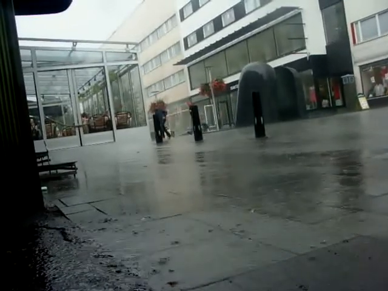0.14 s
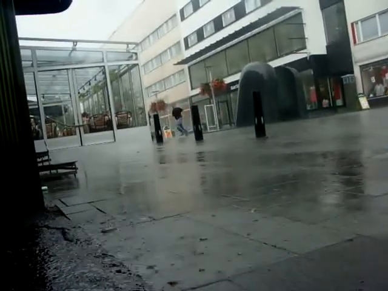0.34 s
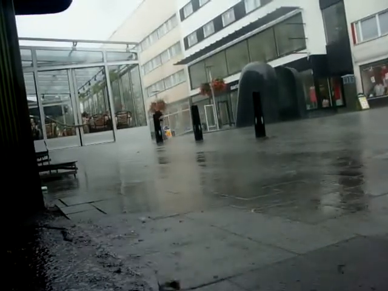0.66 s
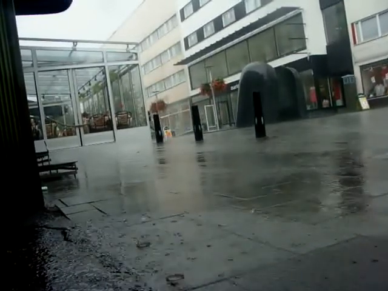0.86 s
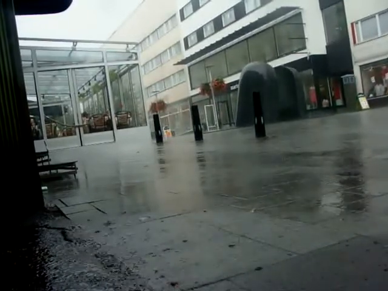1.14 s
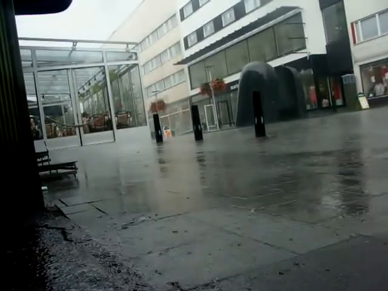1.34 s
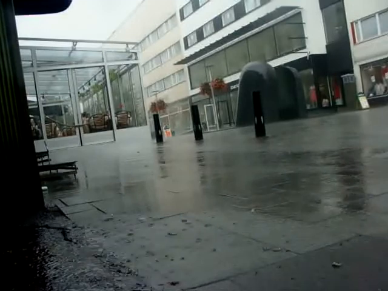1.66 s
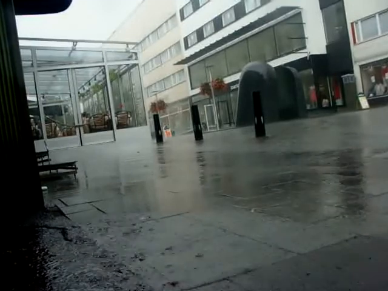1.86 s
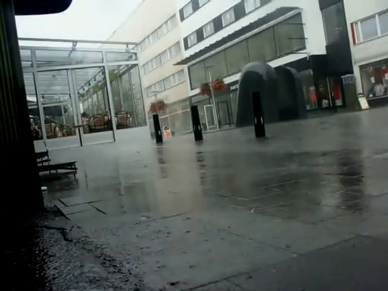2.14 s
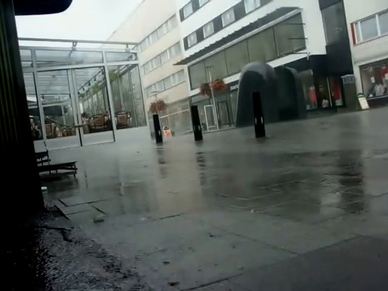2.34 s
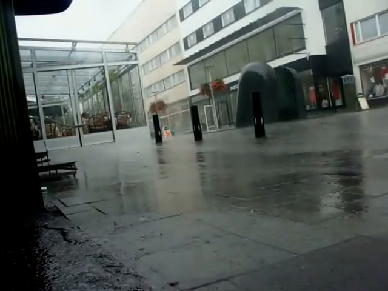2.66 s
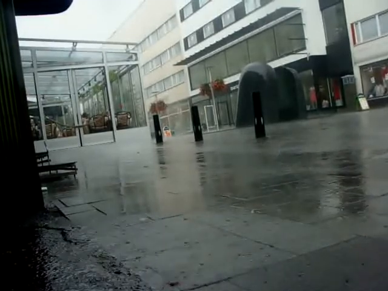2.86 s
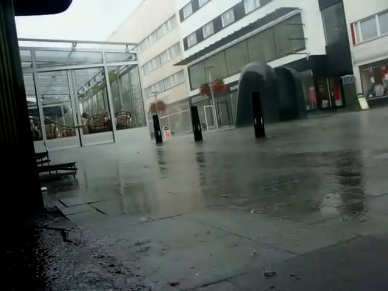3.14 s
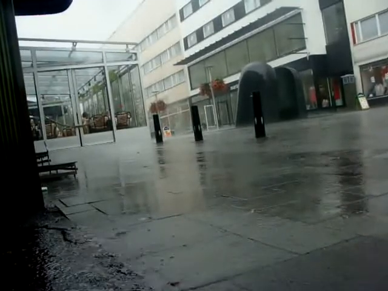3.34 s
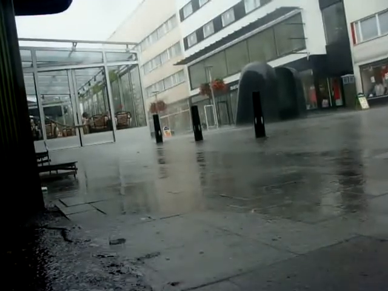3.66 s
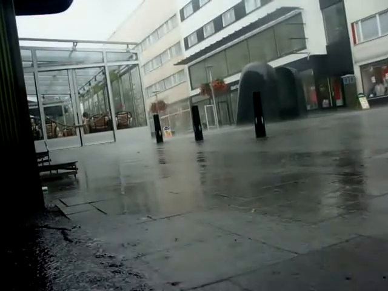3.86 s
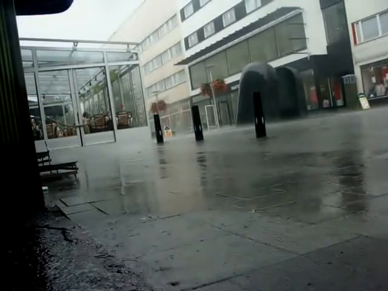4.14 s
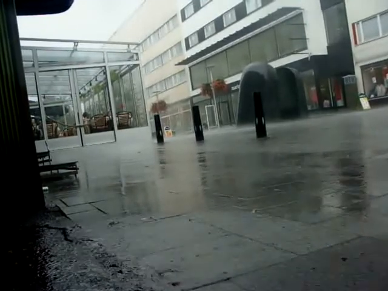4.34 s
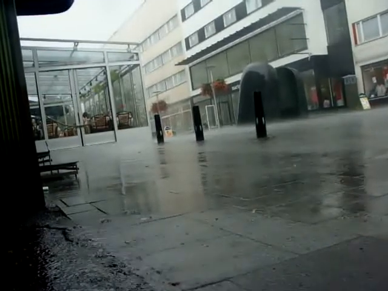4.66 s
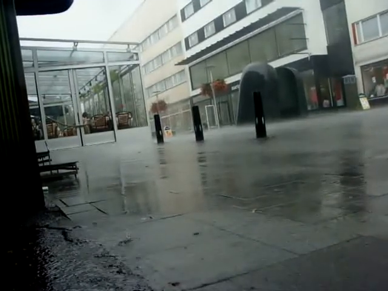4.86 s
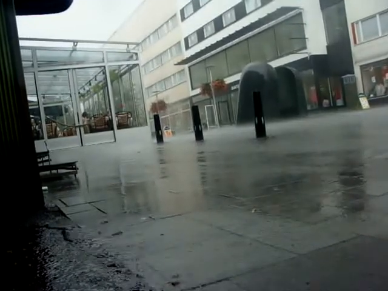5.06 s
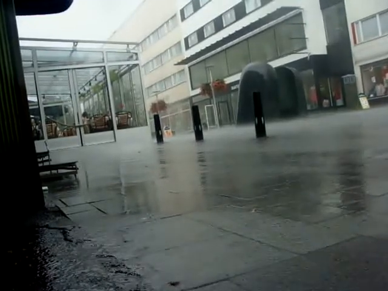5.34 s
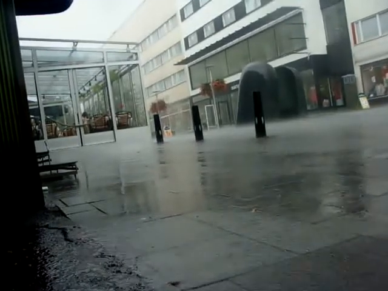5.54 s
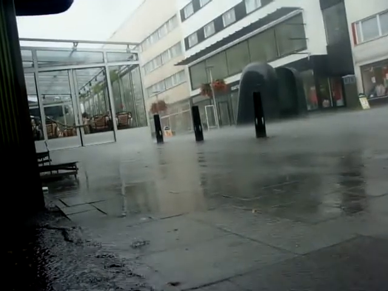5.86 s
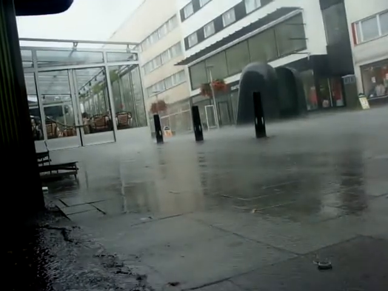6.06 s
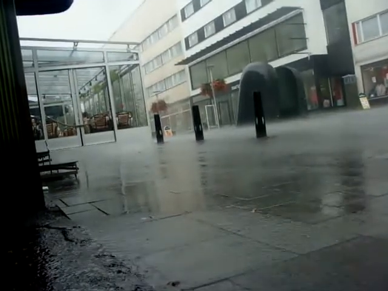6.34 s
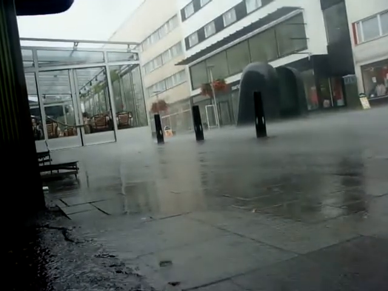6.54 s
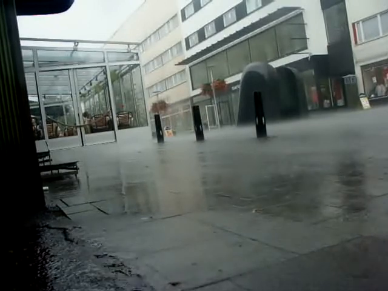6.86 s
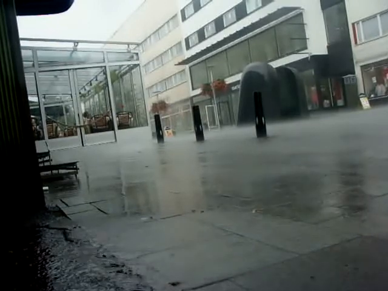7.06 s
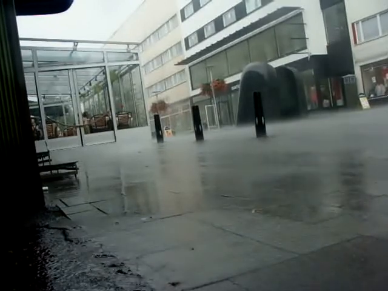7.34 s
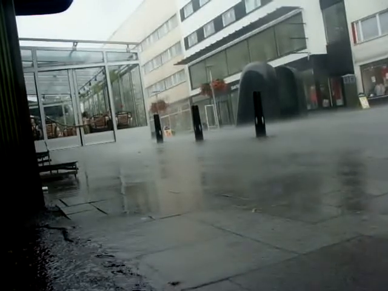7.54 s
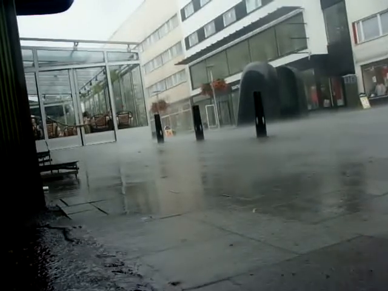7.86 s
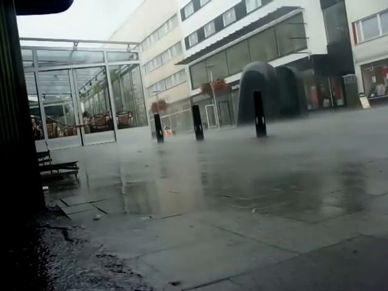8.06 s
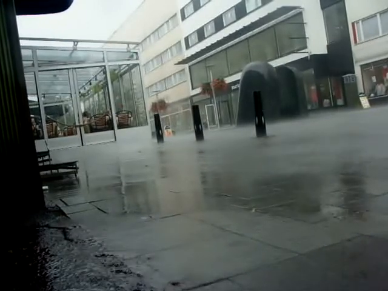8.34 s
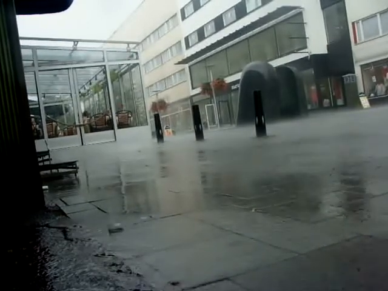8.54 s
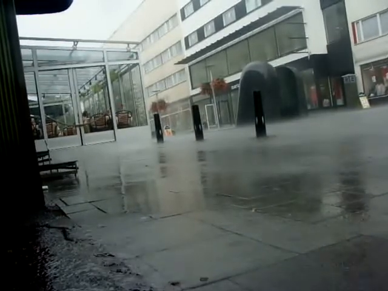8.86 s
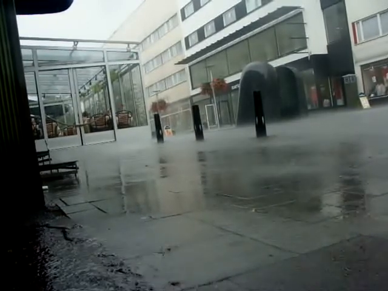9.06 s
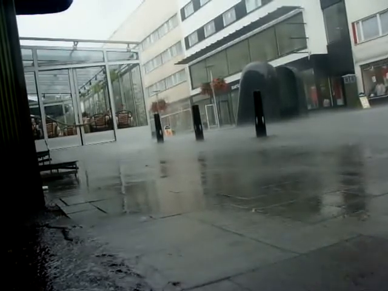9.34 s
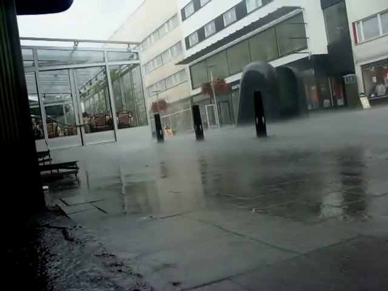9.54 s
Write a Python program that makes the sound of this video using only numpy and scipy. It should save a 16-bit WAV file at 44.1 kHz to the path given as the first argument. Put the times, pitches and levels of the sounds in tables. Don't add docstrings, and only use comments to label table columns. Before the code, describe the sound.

Torrential rain is already at full force at 0 s, a dense continuous hiss over low rumble on flooded street paving, heard from a doorway. Nearer drops patter and tick in the water film. Light eave drips plop with small rising bubble tones around 0.6, 1.1 and 1.3 s; the low roar briefly swells near 1.3 and 2.2 s. The rain eases slightly at 2.5 s, then a heavy drip smacks close with a soft thump at 2.7 s and a duller one at 3.1 s. A lower plop falls at 4.0 s, a patter flurry at 4.5 s, another smack at 4.9 s. From 6 s the downpour thickens, with a sharp plop at 6.2 s and bright ticks. A last heavy smack lands at 8.0 s, and the rain is strongest when it stops at about 9.7 s. Mono small-camera sound, gritty treble, no sharp top.

```python
import sys
import numpy as np
from scipy import signal
from scipy.fft import rfft, irfft, next_fast_len
from scipy.io import wavfile

SR = 44100
rng = np.random.default_rng(int(sys.argv[2]) if len(sys.argv) > 2 else 0)


def volts(x):
    e = np.asarray(x, float) / 20
    return 10 ** e


def transcribe(u):
    v = np.clip(np.atleast_2d(u).T, -1, 1)
    q = np.round(v * 32767).astype(np.int16)
    wavfile.write(sys.argv[1], SR, q)


N = 427329


def rms_one(x):
    return x / np.sqrt(np.mean(x ** 2) + 1e-20)


def in_time(rows):
    s, *columns = np.transpose(rows)
    return [np.interp(np.arange(N) / SR, s, c) for c in columns]


def bells(rows):
    t = np.arange(N) / SR
    return sum(extra_db * np.exp(-0.5 * ((t - s) / half_s) ** 2) for s, extra_db, half_s in rows)


def drift(rate_hz):
    r = np.exp(-80 * np.pi * rate_hz / SR)
    noise = rng.standard_normal(N // 40 + 2002)
    slow = signal.lfilter([1], [1, -2 * r, r * r], noise)[2000:]
    return np.interp(np.arange(N) / 40, np.arange(len(slow)), rms_one(slow))


def ring(clicks, hz, t60_s):
    r = volts(-60 / (t60_s * SR))
    w = 2 * np.pi * hz / SR
    return signal.lfilter([0, np.sin(w)], [1, -2 * r * np.cos(w), r * r], clicks + 1e-18)


def far_rain(rumble_db, hiss_db, spray_db, gust_db, patch_db):
    # pitch_hz, density_db_per_hz
    colour_curve = [(25, -36.5), (70, -13), (195, 0), (298, -7), (410, -2), (520, -3), (615, -7.5),
                    (1020, -5.5), (1190, -6), (2700, -4.5), (4200, -7), (5600, -8), (6800, -13.5),
                    (10200, -19.5)]
    rumble_top_hz, spray_from_hz, lowest_hz = 700, 4500, 44
    size = next_fast_len(N)
    hz = np.maximum(np.arange(size // 2 + 1) * SR / size, 1)
    points = np.array(colour_curve)
    colour_db = np.interp(np.log(hz), np.log(points[:, 0]), points[:, 1])
    white = rfft(rng.standard_normal(size)) * volts(colour_db)
    place = np.clip(2 * np.log2(hz / lowest_hz), 0, 16)
    gust = drift(3.0)
    layers = np.zeros((3, N))
    for k in range(17):
        share = np.cos(np.pi / 2 * np.clip(place - k, -1, 1)) ** 2
        centre_hz = lowest_hz * 2 ** (k / 2)
        treble = np.clip(centre_hz / 8000, 0.15, 1)
        flicker = volts(treble * (gust_db * gust + patch_db * drift(8.0)))
        layer = int(centre_hz > rumble_top_hz) + int(centre_hz > spray_from_hz)
        layers[layer] += flicker * irfft(white * share, size)[:N]
    return sum(volts(db) * rms_one(x) for db, x in zip((rumble_db, hiss_db, spray_db), layers))


def near_drops(level_db, per_s, spread_db, smacks_db):
    sizes = volts(spread_db * np.minimum(rng.exponential(1, N), 3.5)) * rng.choice([-1, 1], N)
    born = sizes * (rng.random(N) < per_s * volts(4.0 * drift(5.0)) / SR)
    pitches_hz = np.geomspace(2600, 9600, 20)
    dealt = rng.integers(0, 20, N)
    rings = np.zeros(N)
    for k, hz in enumerate(pitches_hz):
        pitch_db = -3.5 * np.log2(hz / 4200) ** 2
        rings += ring(born * (dealt == k), hz, 12.0 / hz) * volts(pitch_db)
    smacks = ring(ring(born, 5200, 0.0012), 7500, 0.0006)
    return volts(level_db) * (rms_one(rings) + volts(smacks_db) * rms_one(smacks))


def ticks():
    # start_s, peak_db, pitch_hz, width_hz
    tick_events = [(.7148, -10, 8600, 1300), (1.550, -15, 8100, 800), (1.6388, -9, 7500, 4000),
                   (2.1728, -16, 8250, 500), (2.3528, -10, 7100, 2000), (3.1445, -11, 7000, 3000),
                   (3.6598, -11, 7200, 1000), (4.1698, -11, 7500, 3000), (4.4678, -14, 9600, 1200),
                   (5.8848, -18, 9700, 500), (6.1108, -11, 7100, 1000), (6.6028, -17, 8750, 600),
                   (7.0508, -11, 9000, 2000), (7.4160, -12, 8800, 2000), (8.8966, -10, 8800, 3000),
                   (9.0500, -13, 8400, 1500)]
    out = np.zeros(N)
    for s, peak_db, hz, width_hz in tick_events:
        at = round(s * SR)
        t60_s = np.log(1000) / (np.pi * width_hz)
        out[at:at + 800] += volts(peak_db) * ring(np.arange(800) == 0, hz, t60_s)
    return out


def bubble(t, peak_db, hz, t60_s):
    climb_per_s2 = 1650
    fade = (1 - np.exp(-t / 0.00026)) * volts(-60 * t / t60_s)
    cycles = hz * (t + climb_per_s2 * t60_s * t ** 2 / 2)
    return volts(peak_db) * fade * np.sin(2 * np.pi * cycles), fade


def drips(spatter_db, thump_s):
    # start_s, smack_db, pitch_hz, bubble_t60_s
    splat_events = [
        (2.6723, -4.5, 5350, .018),
        (3.0585, -5, 4600, .012),
        (4.9153, -4, 5400, .007),
        (7.9795, -4.5, 4600, .021),
    ]
    # start_s, peak_db, pitch_hz, t60_s
    plop_events = [(.552, -8, 2600, .011), (.6518, -5, 2780, .024), (.950, -14.5, 4250, .016),
                   (1.09, -10, 3020, .014), (1.330, -14.5, 4380, .016), (3.1646, -14, 3750, .010),
                   (3.3995, -14, 4330, .010), (4.0334, -8, 1730, .012), (4.3745, -12, 4750, .010),
                   (4.4075, -8, 4300, .010), (5.9745, -9, 5460, .008), (6.2078, 0., 4200, .007),
                   (6.2113, -8, 4150, .009), (7.1528, -12, 3450, .013), (8.4375, -9, 5200, .010),
                   (8.65, -11, 5200, .010), (9.2665, -12, 5750, .010)]
    # start_s, peak_db
    thump_events = [
        (2.6721, -27),
        (4.9151, -32),
        (7.9794, -31.5),
    ]
    bubble_under_smack_db, smack_rise_s = 8.0, 0.00023
    out = np.zeros(N + SR)
    t = np.arange(SR // 16) / SR
    bright = signal.butter(2, [4000, 7500], "band", fs=SR, output="sos")
    noise = signal.sosfilt(bright, rng.standard_normal((len(splat_events), len(t))))
    swell = t / smack_rise_s * np.exp(1 - t / smack_rise_s)
    for (s, smack_db, hz, t60_s), spatter in zip(splat_events, noise):
        at = round(s * SR)
        tone, fade = bubble(t, smack_db - bubble_under_smack_db, hz, t60_s)
        partials = ((0.7, 1.02), (0.45, 1.27), (0.2, 1.78))
        crack = swell * sum(share * np.sin(2 * np.pi * ratio * hz * t) for share, ratio in partials)
        out[at:at + len(t)] += tone + volts(smack_db) * (crack + volts(spatter_db) * fade * spatter)
    for s, peak_db, hz, t60_s in plop_events:
        at = round(s * SR)
        out[at:at + len(t)] += bubble(t, peak_db, hz, t60_s)[0]
    for s, peak_db in thump_events:
        at = round(s * SR)
        out[at:at + len(t)] += volts(peak_db) * t / thump_s * np.exp(1 - t / thump_s)
    return out[:N]


def scene():
    # time_s, hiss_db
    rain_curve = [(0.0, -20.5), (1.72, -20.5), (2.53, -21), (5.88, -20), (8.96, -18.5), (9.69, -18)]
    # centre_s, extra_db, half_length_s
    swell_events = [
        (1.32, 2, .15),
        (2.2, 1.5, .12),
        (6.9, 1, 0.72),
    ]
    # centre_s, extra_db, half_length_s
    flurry_events = [
        (1.0, 2.5, 0.06),
        (1.39, -0.5, 0.083),
        (4.47, 3, .13),
    ]
    rain_db, = in_time(rain_curve)
    swing_db = rain_db - rain_db.mean()
    rumble_db = -29.5 + 0.5 * swing_db + bells(swell_events)
    hiss_db = -20.5 + swing_db
    spray_db = -26.5 + 0.9 * swing_db
    street = far_rain(rumble_db, hiss_db, spray_db, gust_db=0.4, patch_db=0.6)
    patter_db = spray_db + bells(flurry_events) - 7.0
    patter = near_drops(patter_db, per_s=350.0, spread_db=4.1, smacks_db=-3.0)
    close = drips(spatter_db=-2.0, thump_s=0.004) + volts(2.8) * ticks()
    return np.tile(street + patter + close, (2, 1))


def subband_basis(count):
    n = np.arange(512) - 255.5
    f = np.linspace(0, 1, 400)[:, None]
    response = np.cos(np.pi / 4 * (1 - np.cos(np.pi * f)))
    shape = (response * np.cos(np.pi * f * n / 32)).sum(0)
    k = np.arange(count)[:, None]
    basis = shape * np.cos(np.pi * (2 * k + 1) * n / 64 + np.pi / 4 * (-1) ** k)
    return basis / np.linalg.norm(basis, axis=1, keepdims=True)


def camera_quantiser(x):
    band_levels = [63, 31, 31, 15, 15, 9, 9, 7, 7, 5] + [3] * 10
    lead_in, full_scale = 244 + 39 * 32, 0.7
    low = signal.resample_poly(x, 320, 441)
    frames = len(low) // 1152 + 3
    span = frames * 1152
    padded = np.pad(low, (lead_in, span + 512 - lead_in - len(low)))
    levels = np.array(band_levels)
    basis = subband_basis(len(levels))
    bands = np.lib.stride_tricks.sliding_window_view(padded, 512)[:span:32] @ basis.T
    bands = bands.reshape(frames, 36, -1)
    peak = np.abs(bands).max(1, keepdims=True) + 1e-9
    scale = 2 ** (np.ceil(3 * np.log2(peak)) / 3)
    step = 2.07 * scale / levels
    rounded = np.clip(np.round(bands / step), -(levels // 2), levels // 2) * step
    pieces = rounded.reshape(-1, len(levels)) @ basis
    out = np.zeros(len(padded))
    for k in range(16):
        out[32 * k:32 * k + span] += pieces[:, 32 * k:32 * k + 32].ravel()
    played = np.clip(out[lead_in:lead_in + len(low)], -full_scale, full_scale)
    return signal.resample_poly(played, 441, 320)[:N]


def roll_off(x):
    return signal.sosfilt(signal.butter(12, 10770, fs=SR, output="sos"), x)


def record(dry):
    mix = np.tile(camera_quantiser(dry[0]), (2, 1))
    return roll_off(mix)


dry = scene()
out = record(dry)
transcribe(out)
```